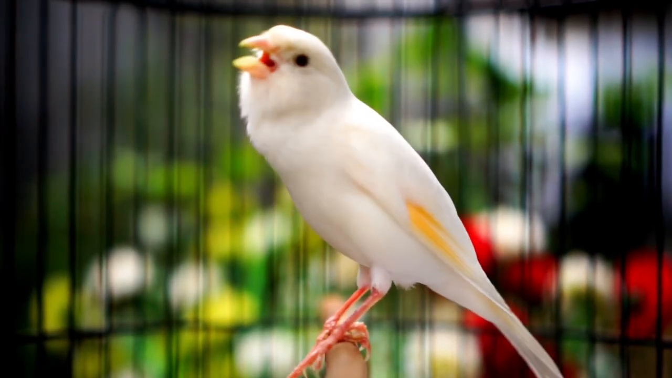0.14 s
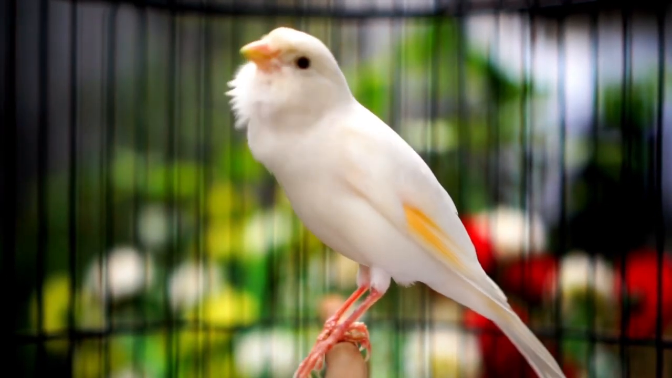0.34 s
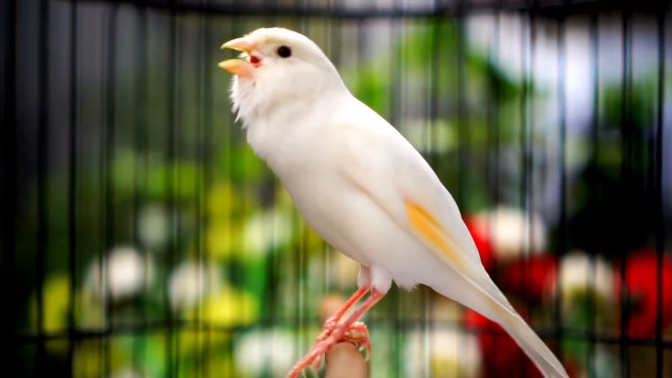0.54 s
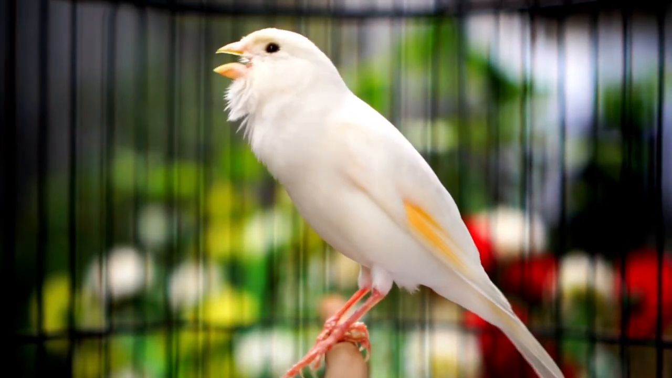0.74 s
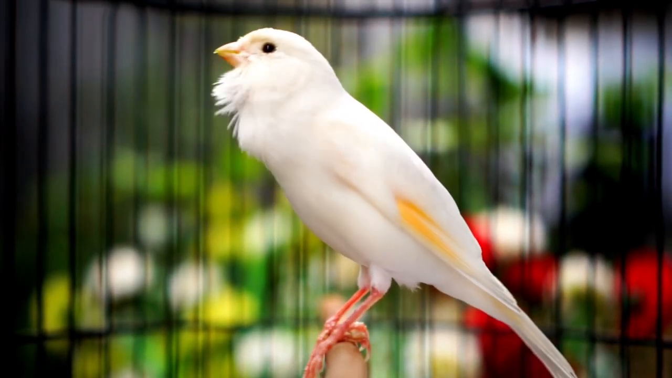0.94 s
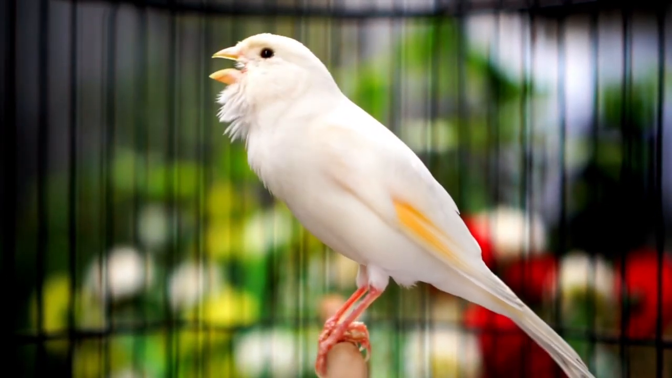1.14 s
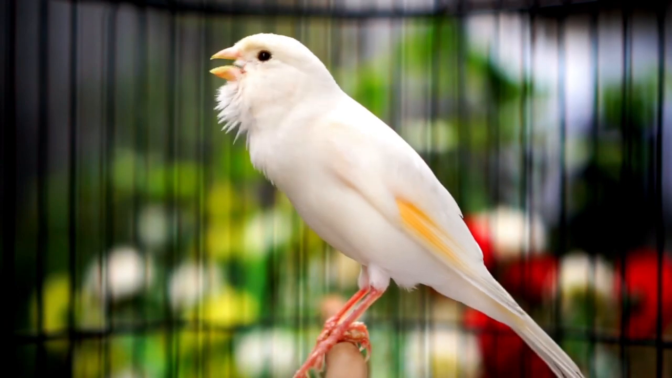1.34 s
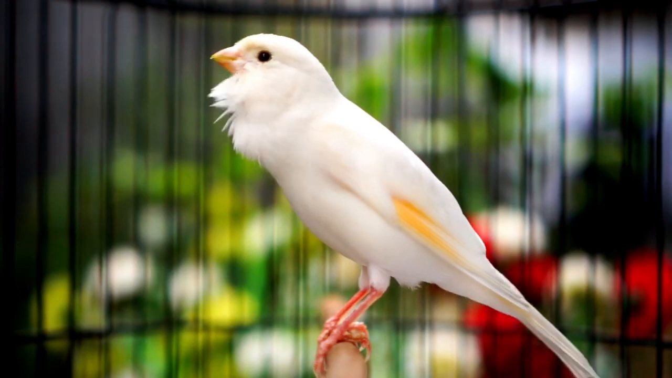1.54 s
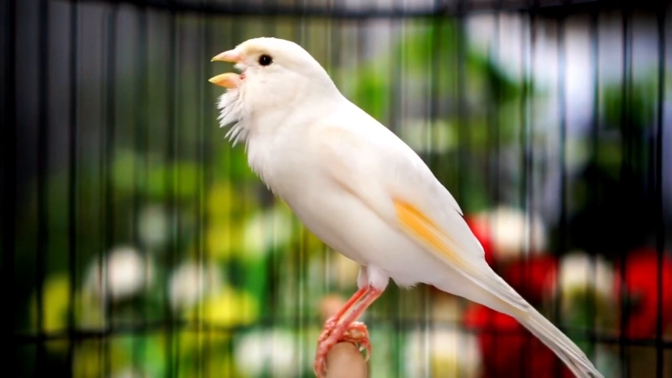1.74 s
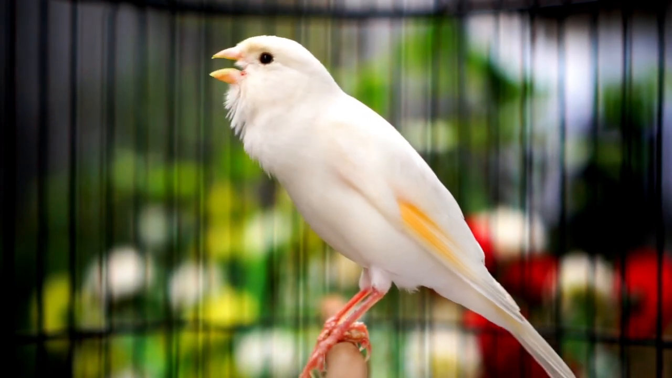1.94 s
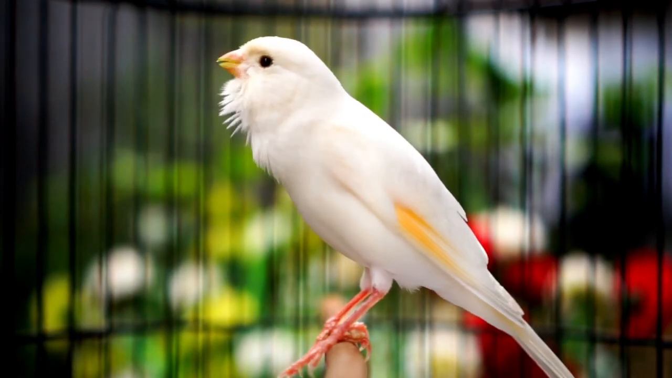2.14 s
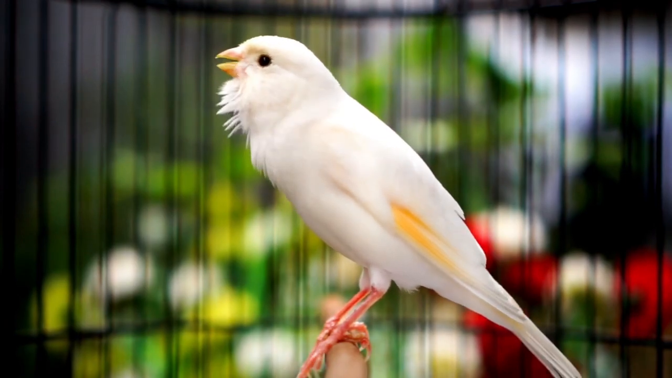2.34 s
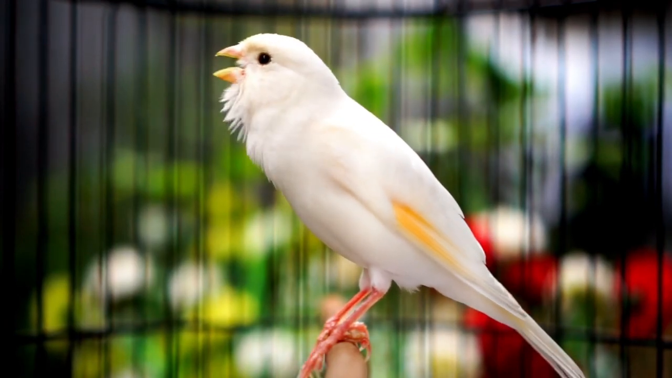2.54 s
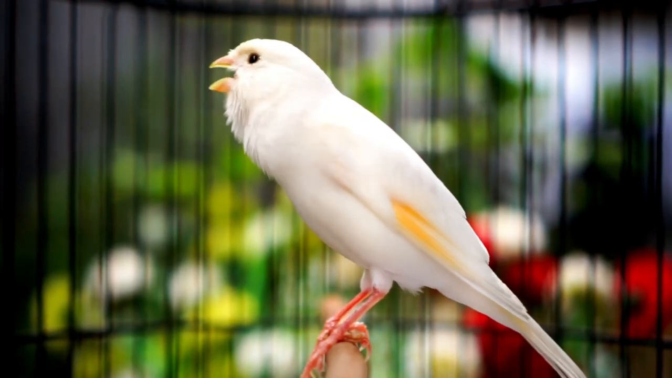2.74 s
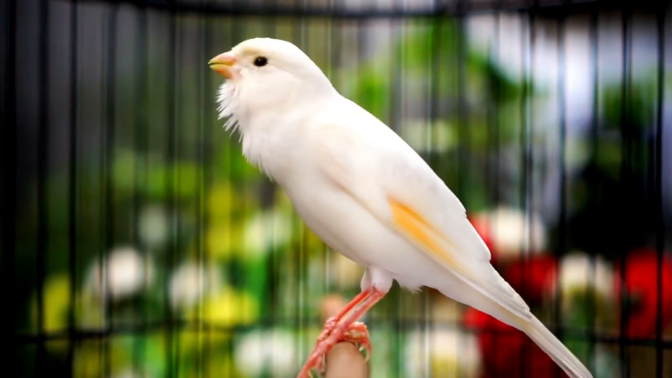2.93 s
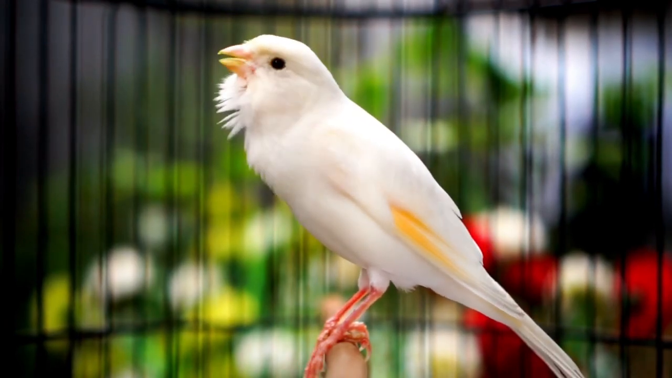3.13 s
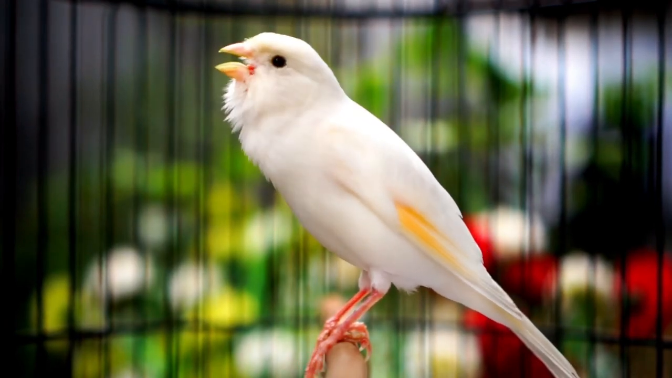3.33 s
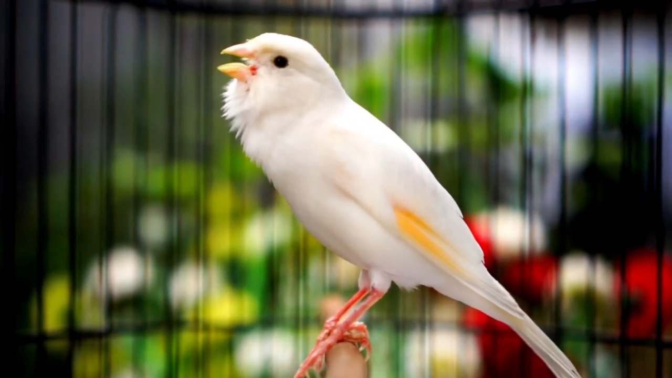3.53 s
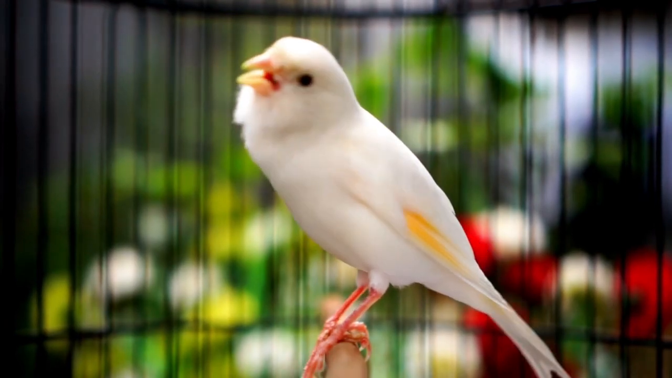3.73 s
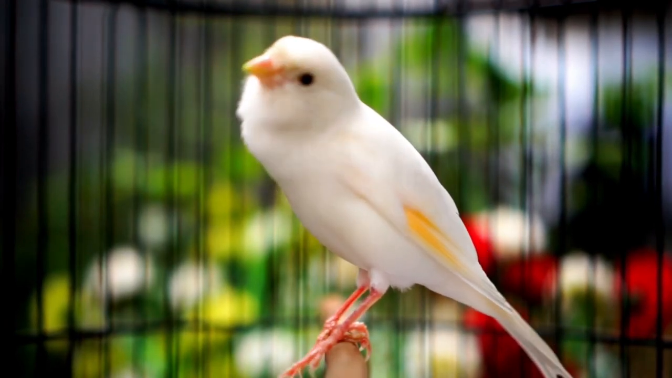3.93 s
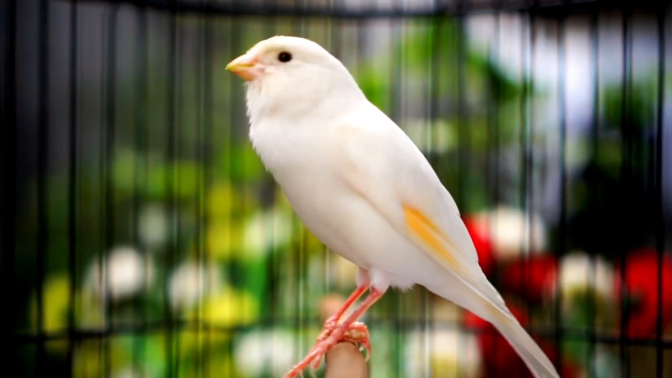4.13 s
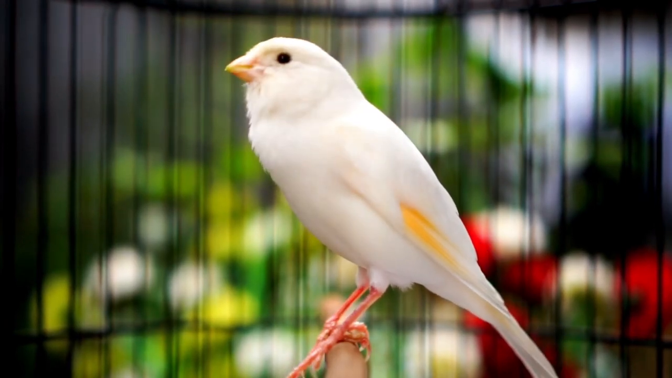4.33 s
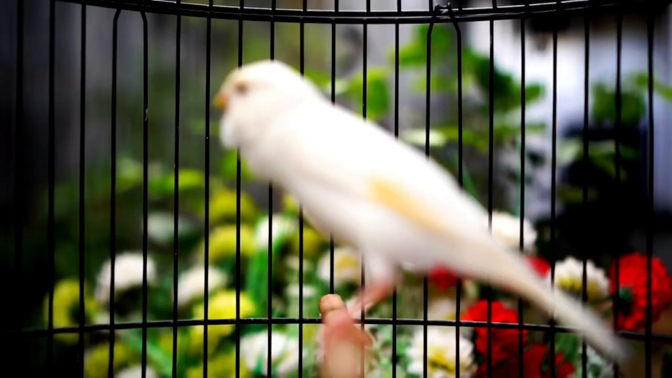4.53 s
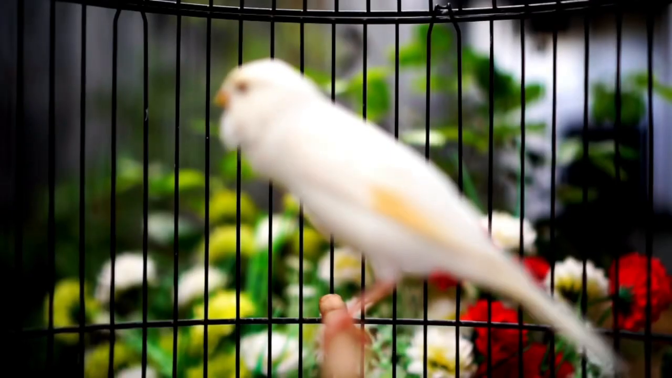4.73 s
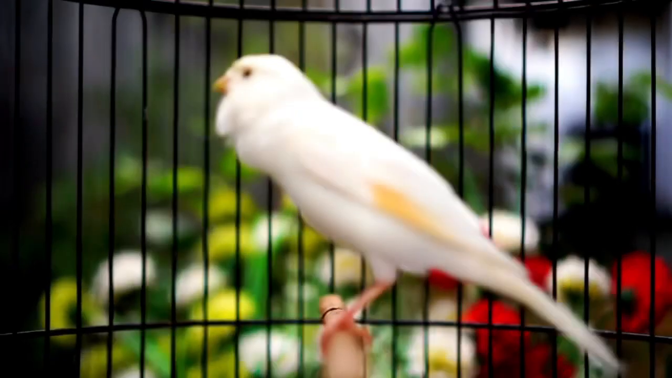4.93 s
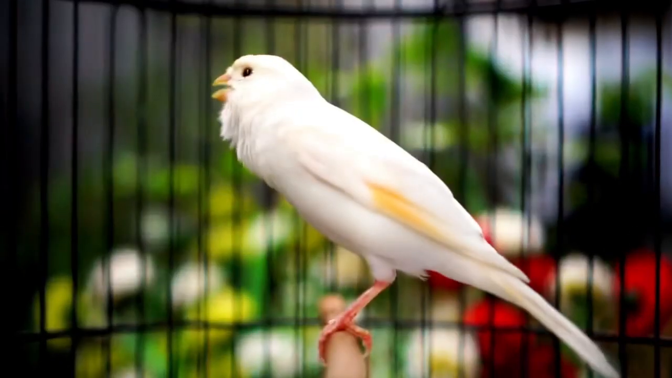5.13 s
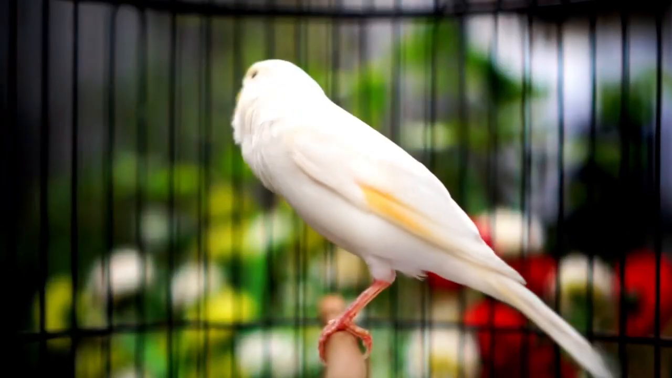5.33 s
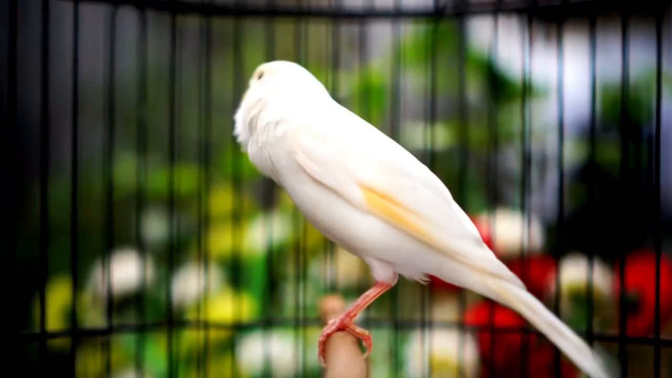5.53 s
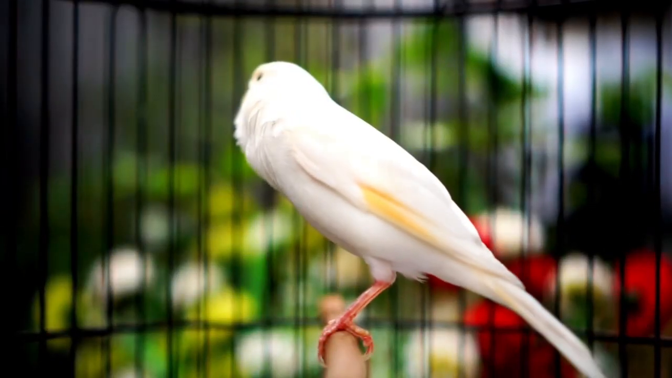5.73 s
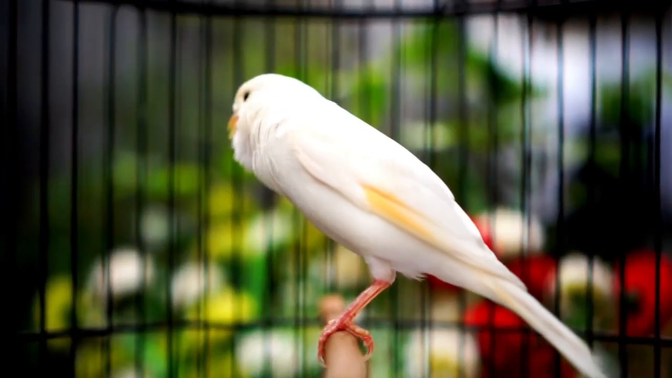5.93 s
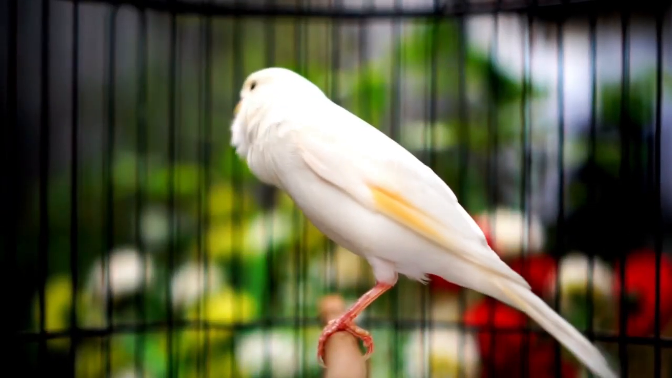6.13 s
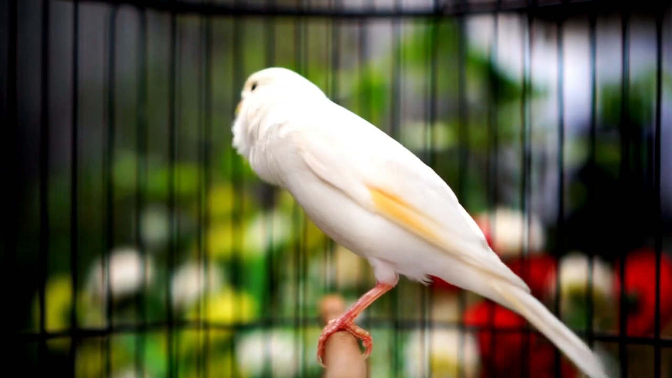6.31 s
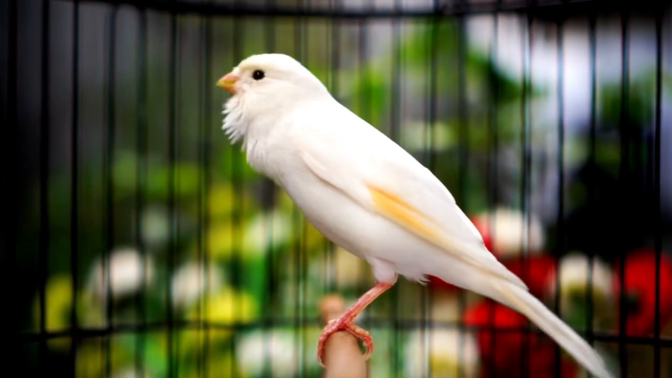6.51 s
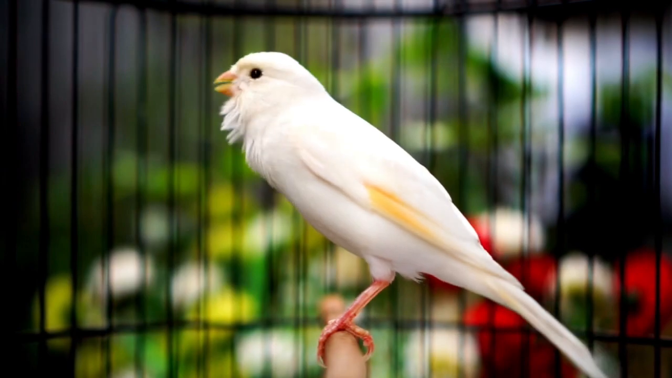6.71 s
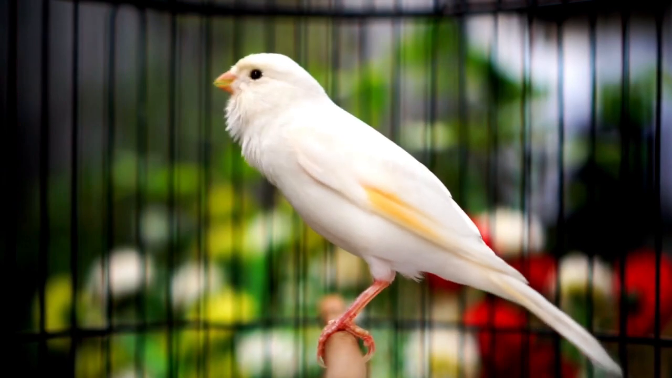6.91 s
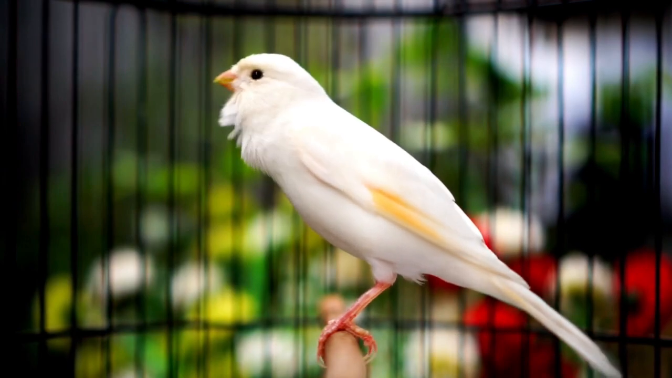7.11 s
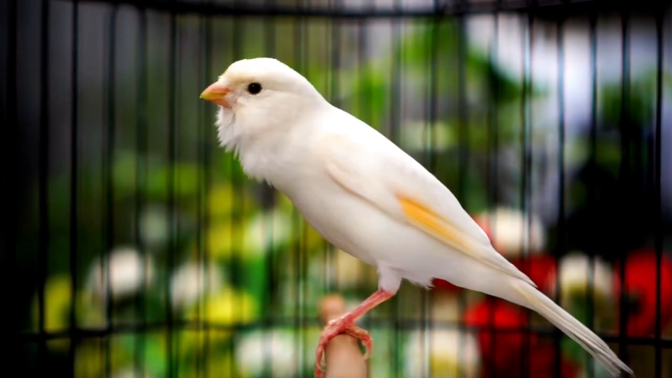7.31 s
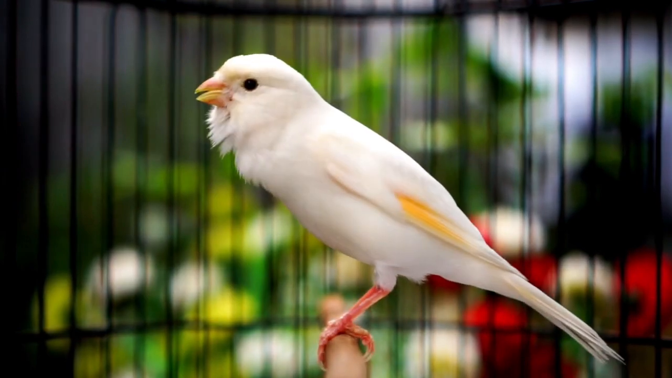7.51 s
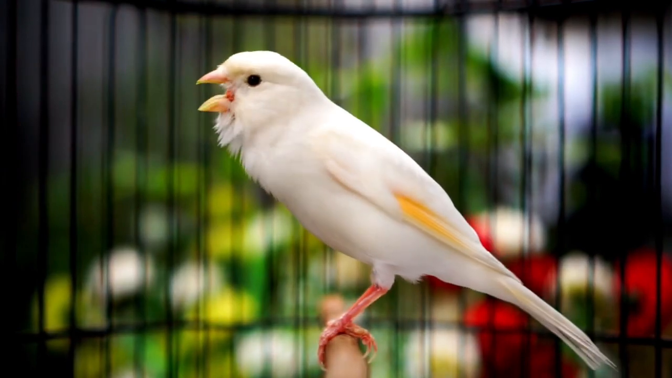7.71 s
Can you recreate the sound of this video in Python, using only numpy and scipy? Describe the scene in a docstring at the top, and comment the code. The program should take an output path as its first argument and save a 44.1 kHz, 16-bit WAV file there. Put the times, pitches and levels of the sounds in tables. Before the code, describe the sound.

A canary sings close by in a small room: sliding whistles, swoops, a fast tick run, rattles and warbles over a swelling, dropping background rush.

```python
"""A canary singing close by

A canary sings close to the microphone in a small room: slides, whistles, swoops, ticks, rolls and warbles.
Each syllable is a gliding tone with overtones, often repeated in a run; near walls and the room answer it.
A second bird sings faintly further off. Behind them filtered noise makes a rush that swells, then drops
back to a deeper rumble, with a low hum at its crest."""
import sys
import numpy as np
from scipy import signal
from scipy.fft import rfft, irfft, next_fast_len
from scipy.io import wavfile
from scipy.ndimage import map_coordinates

SR = 44100
rng = np.random.default_rng(int(sys.argv[2]) if len(sys.argv) > 2 else 0)


def waveform_to_disk(signal):
    """Save audio, clipped to [-1, 1], as 16-bit WAV at the path in sys.argv[1]."""
    frames = np.transpose(np.atleast_2d(signal))
    scaled = np.clip(frames, -1, 1) * 32767
    samples = np.round(scaled).astype(np.int16)
    wavfile.write(sys.argv[1], SR, samples)


N = 346626
TIME = np.arange(N) / SR
DROP_S = 4.68  # the rumble turns deeper here
HUM_HZ = 191.6  # centre of the wavering hum
TOP_HZ = 11250  # upper limit of the recorder

# All levels in these tables are those before the final mix.
# Shapes of the falling syllables, before each note's stretch and pitch factor; the names give the units
SLIDE_SHAPE = dict(length_s=0.22, end_hz=2725, fall_hz_per_s=15300, plunge_hz=1296, plunge_s=0.022, attack_s=0.034, release_s=0.047, edge_db=9, crescendo_db=12.5, third_db=-5)
TICK_SHAPE = dict(length_s=0.019, end_hz=3090, fall_hz_per_s=198000, plunge_hz=681, plunge_s=0.0017, attack_s=0.00086, release_s=0.0025, edge_db=32, crescendo_db=35.5, third_db=-25)
CHUCK_SHAPE = dict(length_s=.027, end_hz=1196, fall_hz_per_s=55000, plunge_hz=922, plunge_s=0.00375, attack_s=0.013, release_s=.011, edge_db=21, crescendo_db=3.5, third_db=0)
CHIP_SHAPE = dict(length_s=0.033, end_hz=2225, fall_hz_per_s=12000, plunge_hz=898, plunge_s=0.0024, attack_s=0.011, release_s=0.0082, edge_db=37, crescendo_db=-5, third_db=-14)
FAR_CHIRP_SHAPE = dict(length_s=0.069, end_hz=4800, fall_hz_per_s=13000, plunge_hz=302, plunge_s=.02, attack_s=0.014, release_s=0.056, edge_db=8, crescendo_db=-10, third_db=-23, jitter=0.058)
# Runs of falling syllables: [end t/s, time stretch, pitch factor, level/dB]
SLIDE_RUN = [(.043, 1, 1.035, -12.5), (.308, 0.95, 0.967, -15.5)]
TICK_RUN = [(3.23, 0.6, 1.06, -15), (3.2638, .33, 0.91, -11), (3.3005, 0.71, 0.98, -10.5),
            (3.342, .95, 0.96, -10.5), (3.3845, 0.84, 0.96, -10), (3.4287, 1.05, 0.95, -10),
            (3.4753, 0.85, 0.99, -9.5), (3.5202, 0.56, 0.98, -9), (3.5669, 0.93, 0.98, -10),
            (3.6155, 0.88, 0.98, -9.5), (3.6628, 0.77, 0.99, -9.5), (3.712, 1.2, 0.98, -9.5),
            (3.7653, 1.1, 0.98, -11.5)]
CHUCK_RUN = [(4.571, 0.73, 0.92, -28), (4.645, 0.9, 0.94, -23.5), (4.713, 0.82, 0.94, -18.5),
             (4.775, 0.81, 0.91, -18.5), (4.836, 0.83, 0.95, -16.5), (4.8965, 0.98, 0.93, -20),
             (4.962, 0.94, 0.93, -17)]
CHIP_RUN = [(5.041, 0.96, 1, -11.5)]  # the chip that ends the chucks
FAR_CHIRP_RUN = [(4.97, 1, 1, -37), (5.61, 0.8, 1, -35), (6.14, 1, 0.98, -38), (6.29, 1, 0.98, -36),
                 (6.44, 1, 0.96, -29), (6.59, 1, 1, -37)]
# Whistles of the near and the far bird: [start t/s, length t/s, start f/Hz, held f/Hz, rise t/s, drift/(Hz/s),
# attack t/s, release t/s, rising level/dB, held level/dB, dip between the two voices/dB]
WHISTLE_NOTES = [(.374, 0.18, 2916, 5640, 0.095, 1100.5, 0.022, 0.021, -14, -34, 36),
                 (.648, 0.22, 2900, 5113, .068, -1100, 0.012, 0.055, -20, -29.5, 10),
                 (.915, 0.27, 2280, 4081, 0.11, 154, 0.06, 0.014, -18.5, -15.5, 8.5),
                 (1.227, 0.22, 2200, 4022, 0.11, 123.5, 0.069, 0.019, -15, -13.5, 7.5),
                 (1.523, 0.25, 2167, 4007, 0.11, 74, 0.07, 0.019, -15, -14, 4.5),
                 (5.083, 0.12, 3630, 4077, 0.018, -700, 0.014, 0.038, -12.5, -12.5, 1.5),
                 (5.239, 0.11, 3078, 4040, 0.018, 451.5, 0.021, 0.019, -12, -12, 1.5)]
FAR_WHISTLE_NOTES = [(6.92, 0.19, 4270, 4650, 0.072, 503, 0.055, 0.037, -46, -31.5, 0.00023),
                     (7.12, 0.073, 5015, 5700, 0.024, 2, 0.026, 0.037, -41, -40.5, 0),
                     (7.19, 0.15, 4140, 4680, .13, 0, 0.058, 0.016, -33.5, -28.5, 0)]
# Swoops of the near and the far bird: [start t/s, time stretch, pitch factor, level/dB]
SWOOP_RUN = [(1.904, 0.99, 0.98, -14), (2.169, 0.94, 1, -13.5), (2.428, 0.97, 0.99, -12.5),
             (2.689, 0.92, 1.001, -13.5), (2.951, 0.95, 0.99, -12.5)]
FAR_SWOOP_RUN = [(3.82, 0.47, 1.07, -32.5), (3.98, 0.83, 0.96, -29), (4.25, .85, .99, -31),
                 (4.5, 0.96, 0.89, -31.5)]
# Arched notes, each answered by a peep from the other side of the syrinx (the bird's voice organ):
# [start t/s, length t/s, top f/Hz, level/dB, peep level/dB]
ARCH_NOTES = [(5.595, 0.0057, 3420, -12.5, -18), (7.283, 0.019, 2993, -18.5, -22),
              (7.308, .02, 3210, -9.5, -17), (7.333, .02, 3342, -13, -24), (7.356, .019, 3450, -10.5, -26),
              (7.383, 0.017, 3396, -12.5, -21), (7.408, .018, 3525, -9, -24),
              (7.433, 0.014, 3545, -11, -20.5), (7.457, .02, 3538, -9, -25), (7.485, .016, 3460, -16, -42)]
# Rolls of rattles: [start t/s, length t/s, spacing t/s, level/dB]
RATTLE_ROLLS = [(5.418, .111, 0.01, -26), (6.031, .112, 0.013, -23), (6.225, .105, 0.014, -23),
                (6.387, .105, 0.013, -19.5), (6.92, .116, 0.011, -24.5), (7.125, .104, 0.012, -22.5)]
# Warbled phrases: [start t/s, length t/s, first low note f/Hz, last low note f/Hz, level/dB]
WARBLE_PHRASES = [(5.599, 0.35, 3510, 3320, -11), (6.546, 0.3, 3473, 3293, -12.5)]
# Crests that the warbles climb to: [t/s, height f/Hz, width t/s, weakening/dB]
WARBLE_CRESTS = [(5.625, 1117, .019, 5), (5.685, 853, .016, 8.5), (5.749, 878, .019, 5),
                 (5.819, 826, .02, 5), (5.895, 735, .018, 7), (6.579, 1207, .023, 4),
                 (6.642, 837, .018, 5.5), (6.706, 875, .02, 4), (6.78, 823, .021, 6.5)]
# How strongly the microphone picks up the overtones: [f/Hz, level/dB]
OVERTONE_LEVELS = [(4000, -11), (6000, -43), (7500, -34.5), (8300, -32), (9500, -27.5), (11000, -24.5)]
# Extra strength of the ticks' overtones: [f/Hz, level/dB]
TICK_OVERTONE_BOOST = [(8300, 1), (9500, 8.5), (10700, 16)]
# Left-right difference for each pitch: [f/Hz, level/dB]
PITCH_BALANCE = [(2000, -5.5), (2700, 7), (3300, -3.5), (3700, 4), (4050, 4), (4500, 5.5), (5200, 5),
                 (7000, 2)]
# Left-right difference as the head turns: [t/s, level/dB]
HEAD_BALANCE = [(0, 3.5), (1.1, 3.5), (1.7, 4), (2.2, 4), (3.4, 1), (5.2, 3.5), (5.7, 1), (6.7, 0.5),
                (7.8, 2.5)]
# Delay of the left port as the bird shifts on its perch: [t/s, delay t/ms]
PORT_LAG = [(3.5, 0), (4.2, 0.096), (6.4, 0.068), (7, 0)]
# Echoes of near surfaces: [delay t/s, left gain, right gain]
WALL_ECHOES = [(.003, 0.066, 1), (.0074, 0.13, 0.17), (0.0111, 0.19, 0.12), (0.0197, .24, 0.18)]
# Time in which the room's tail fades by 60 dB: [f/Hz, fade t/s]
ROOM_FADE = [(1000, 0.25), (3000, 0.63), (5000, 0.56), (11000, 0.53)]
# Course of the rush, before the lift of its middle part: [t/s, low level/dB, middle level/dB]
RUSH_LEVELS = [(0.0, -68, -70), (0.5, -75, -71.5), (1.05, -65, -63), (1.878, -53.5, -52.5),
               (2.299, -55, -55.5), (3.4, -49, -48), (4.6, -40.5, -41.5), (4.77, -57.5, -53.5),
               (5.65, -60, -47), (6.45, -54, -45), (6.7, -57, -55), (7.35, -53.5, -48.5),
               (7.86, -62, -52.5)]
# Relative colours of the rumble before and after the drop, and of the airy middle: [f/Hz, level/dB]
EARLY_RUMBLE = [(15, -65.5), (25, -37.5), (124, -13.5), (184, -8), (230, -10), (280, -3.5), (360, -2),
                (500, -8), (700, -4), (910, -15.5), (1540, -120)]
LATE_RUMBLE = [(15, -60), (25, -23), (59, -3), (179, 0.5), (287, 1), (334, -4), (700, -5), (910, -25.5),
               (1540, -120)]
AIR_COLOUR = [(400, -14.5), (700, -7), (900, 1), (1090, 2), (1300, -2), (2000, -5), (4000, -2), (7000, -17),
              (11000, -22.5)]
# Likeness of the left and right rush, 1 being the same: [f/Hz, likeness]
STEREO_LIKENESS = [(30, .6), (100, 0.96), (300, 0.93), (700, 0.74), (1500, 0.51), (5000, 0.096)]
# The low tone at the crest of the rush: [t/s, level/dB]
HUM_LEVELS = [(3.5, -67), (3.9, -54), (4.55, -46.5), (4.66, -60), (4.72, -92)]


def near_bird(flutter_edge_db=5):
    """The whole near song; the fluttering phrases have slightly stronger overtones."""
    clear = downsweeps(SLIDE_RUN, **SLIDE_SHAPE) + downsweeps(CHUCK_RUN, **CHUCK_SHAPE)
    clear += downsweeps(CHIP_RUN, **CHIP_SHAPE)
    clear += whistles(WHISTLE_NOTES) + swoops(SWOOP_RUN) + arches()
    fluttering = (warbles() + quaver()) * amp([[0], [flutter_edge_db]])
    return microphone(clear + sharp_song() + fluttering)


def downsweeps(run, length_s, end_hz, fall_hz_per_s, plunge_hz, plunge_s, attack_s, release_s,
               edge_db, crescendo_db, third_db, jitter=.002):
    """The pitch falls steadily as the level changes, then plunges as the syrinx lets go."""
    track = np.zeros((2, N))
    for end, stretch, pitch, db in run:
        at, t = span(end - stretch * length_s, stretch * length_s)
        t = t / stretch
        left = length_s - t  # time still to go
        plunge = plunge_hz * (1 - np.exp(-left / plunge_s))
        hz = end_hz + fall_hz_per_s * left + plunge
        level = envelope(t, attack_s, release_s, edge_db)
        level -= crescendo_db * np.maximum(left - release_s, 0) / length_s
        add(track, at, pitch * hz, db + level, jitter=jitter, third_db=third_db)
    return track


def whistles(rows, knee_hz=125, scoop_hz=650, scoop_s=.006, break_hz=3620, break_width_hz=260,
             sag_db_per_s=14, settle_share=0.69):
    """A scoop and a climb to a held note; the level dips where one side of the syrinx hands to the other."""
    track = np.zeros((2, N))
    for row in rows:
        s, length, start_hz, held_hz, rise, drift, attack, release, rising_db, held_db, break_db = row
        at, t = span(s, length)
        held_time = np.maximum(t - rise, 0)
        climb = ease((held_hz - start_hz) * (1 - t / rise), knee_hz)
        scoop = scoop_hz * np.exp(-t / scoop_s)
        hz = held_hz + drift * held_time - climb - scoop
        settling = bump((t / rise) ** 2, 0, settle_share ** 2)  # from the rising level to the held one
        level = held_db + (rising_db - held_db) * settling - sag_db_per_s * held_time
        level += envelope(t, attack, release, edge_db=29)
        level -= break_db * bump(hz, break_hz, break_width_hz)
        add(track, at, hz, level, jitter=.002, shimmer_db=.7, third_db=-7)
    return track


def swoops(run, length_s=.22, aim_hz=2430, drop_hz=5600, relax_s=0.08, rest_hz=2940,
           scoop_hz=2000, scoop_s=0.00308, break_hz=4150, break_width_hz=430, break_db=6, swell_db_per_s=20):
    """The pitch leaps up and relaxes to a resting note, swelling but for a dip between the two voices."""
    track = np.zeros((2, N))
    for s, stretch, pitch, db in run:
        at, t = span(s, stretch * length_s)
        t = t / stretch
        relaxing = aim_hz + drop_hz * np.exp(-t / relax_s)
        hz = rest_hz + ease(relaxing - rest_hz, knee=70)
        hz -= scoop_hz * np.exp(-t / scoop_s)
        level = envelope(t, attack_s=0.088, release_s=0.071, edge_db=18.5)
        level += swell_db_per_s * (t - length_s / 2)
        level -= break_db * bump(hz, break_hz, break_width_hz)
        add(track, at, pitch * hz, db + level, third_db=-3)
    return track


def sharp_song(roll_edge_db=8):
    """Ticks and rolls are forced out abruptly, which strengthens their overtones."""
    ticks, rattles = downsweeps(TICK_RUN, **TICK_SHAPE), rolls()
    tick_overtones = filtered(ticks[1], lambda hz: amp(along(TICK_OVERTONE_BOOST, hz)))
    return np.array([ticks[0] + rattles[0], tick_overtones + amp(roll_edge_db) * rattles[1]])


def rolls(top_hz=3900, base_hz=2050, relax_s=0.00207, rattle_s=0.01, fade_db=5):
    """Each rattle snaps down to a low base note; the roll swells and fades."""
    track = np.zeros((2, N))
    for s, length, spacing, db in RATTLE_ROLLS:
        count = round(length / spacing)
        # Chance differences of each rattle: time (s), share of the pitch, level (dB)
        chance = rng.standard_normal((count, 3)) * [.0003, .025, 1.5]
        for k, (dt, bend, level) in enumerate(chance):
            at, t = span(s + spacing * k + dt, rattle_s)
            hz = (base_hz + (top_hz - base_hz) * np.exp(-t / relax_s)) * (1 + bend)
            level += envelope(t, attack_s=.0006, release_s=.004, edge_db=8)
            level -= fade_db * (2 * k / count - .8) ** 2
            add(track, at, hz, db + level, jitter=0.017, third_db=-0.5, fourth_db=-14)
    return track


def arches(top_share=0.596, bend_hz=1900, peep_hz=4250, peep_s=0.01, overlap_s=0.001):
    """Short notes that rise and tip over, each followed by a higher peep."""
    track = np.zeros((2, N))
    for s, length, top_hz, db, peep_db in ARCH_NOTES:
        at, t = span(s, length)
        share = t / length
        hz = top_hz - bend_hz * (share - top_share) ** 2
        # Here the attack and release are shares of the note
        add(track, at, hz, db + envelope(share, .3, .35, edge_db=21), third_db=-5)

        at, t = span(s + length - overlap_s, peep_s)
        hz = peep_hz - bend_hz / 2 * (t / peep_s - top_share) ** 2
        add(track, at, hz, peep_db + envelope(t, peep_s / 2, peep_s / 2, edge_db=3))
    return track


def warbles(flutter_hz=380, flutter_depth_hz=170, scatter_hz=70, rough_db=3.5, pulse_db=2.5,
            slow_fall=1.15, squareness=2.8):
    """A loud low note climbs to crest after crest, where it weakens and turns rough and fluttery."""
    track = np.zeros((2, N))
    when, height, width, weakening = np.transpose(WARBLE_CRESTS)
    for s, length, first_hz, last_hz, db in WARBLE_PHRASES:
        at, t = span(s, length)
        away = (s + t[:, None] - when) / width
        away = np.where(away > 0, away / slow_fall, away)  # crests fall slower than they rise
        crests = np.exp(-np.abs(away) ** squareness)
        rough = np.clip(1.5 * crests.sum(axis=1), .15, 1)
        flutter_rate = flutter_hz * (1 + .15 * wobble(at, 150))
        flutter = np.sin(2 * np.pi * np.cumsum(flutter_rate) / SR)
        hz = first_hz + (last_hz - first_hz) * t / length + crests @ height
        hz += rough * (flutter_depth_hz * flutter + scatter_hz * wobble(at, 450))
        level = db + envelope(t, attack_s=0.0095, release_s=0.036, edge_db=20) - crests @ weakening
        level += rough * (rough_db * wobble(at, 400) - pulse_db * flutter)
        add(track, at, hz, level, jitter=.004, third_db=-8.5)
    return track


def quaver(s=7.545, length_s=.226, start_hz=3830, climb_hz=1400, climb_s=0.11, period_s=0.0035, slowing=0.033,
           depth_hz=200, widen_hz_per_s=3900, db=-15.5, fade_db_per_s=12, pulse_db=4):
    """The closing buzz climbs; its zigzag vibrato slows and widens, loudest at the bottom of each swing."""
    track = np.zeros((2, N))
    at, t = span(s, length_s)
    swings_per_s = 1 / (period_s + slowing * t)
    swing = signal.sawtooth(2 * np.pi * np.cumsum(swings_per_s) / SR, .5)
    hz = start_hz + climb_hz * (1 - np.exp(-t / climb_s))
    hz += (depth_hz + widen_hz_per_s * t) * swing
    level = db + envelope(t, attack_s=.006, release_s=0.031, edge_db=10)
    level -= fade_db_per_s * (t - length_s / 2) + pulse_db * swing
    add(track, at, hz, level, jitter=.003)
    return track


def add(track, at, hz, db, jitter=0.0017, shimmer_db=1.5, third_db=-4, fourth_db=-18):
    """Sing one slightly unsteady tone into track: the fundamental in row 0, its overtones in row 1."""
    hz = hz * (1 + jitter * wobble(at, 500))
    phase = 2 * np.pi * np.cumsum(hz) / SR
    size = np.sqrt(2) * amp(db + shimmer_db * wobble(at, 120))
    size = size * signal.windows.tukey(len(at), np.clip(96 / len(at), .05, 1))  # soft ends, no clicks
    track[0, at] += size * np.sin(phase)
    for k, level in enumerate([0, third_db, fourth_db], 2):
        audible = np.clip((SR / 2 - k * hz) / 6000, 0, 1)  # fade out below half the sample rate
        track[1, at] += size * amp(level) * audible * np.sin(k * phase)


def microphone(track, notch_hz=6200, notch_width_hz=450, notch_db=13):
    """The microphone hears the fundamental freely but for one notch in the treble; the overtones stay weak."""
    tone = filtered(track[0], lambda hz: amp(-notch_db * bump(hz, notch_hz, notch_width_hz)))
    overtones = filtered(track[1], lambda hz: amp(along(OVERTONE_LEVELS, hz)))
    return tone + overtones


def far_bird():
    """A second canary sings swoops, hoarse chirps and whistles, made in the same way."""
    chirps = downsweeps(FAR_CHIRP_RUN, **FAR_CHIRP_SHAPE)
    return microphone(swoops(FAR_SWOOP_RUN) + chirps + whistles(FAR_WHISTLE_NOTES))


def walls(x, ring_s=0.022, ring_hz=2720, ring_width_hz=220, ring_db=-11):
    """Direct sound at the two ports, and echoes of near surfaces; one returns only a narrow band."""
    half_lag = np.interp(TIME, *np.transpose(PORT_LAG)) * SR / 2000  # half the lag, ms to samples
    out = np.array([map_coordinates(x, [np.arange(N) + side * half_lag]) for side in (-1, 1)])
    for delay, left, right in WALL_ECHOES:
        echo = np.pad(x, (int(delay * SR), 0))[:N]
        out += np.outer([left, right], echo)

    def narrow_echo(hz):
        delayed = np.exp(-2j * np.pi * hz * ring_s)
        return bump(hz, ring_hz, ring_width_hz) * delayed
    return out + amp(ring_db) * filtered(x, narrow_echo)


def room(x, gap_s=0.0046):
    """The diffuse tail: noise in which each frequency dies at its own speed."""
    hz, t, z = signal.stft(rng.standard_normal((2, SR // 2)), SR, nperseg=256)
    fading = amp(-60 * t / along(ROOM_FADE, hz)[:, None])
    tail = signal.istft(z * fading, SR, nperseg=256)[1]
    tail = tail / np.linalg.norm(tail[0])
    late = np.pad(x, (int(gap_s * SR), 0))
    return signal.fftconvolve(late[None], tail, axes=1)[:, :N]


def background(air_db=5.0, wander_db=1.54):
    """A broad, slightly unsteady rush that swells, drops back and leaves a deeper rumble."""
    s, low, middle = np.transpose(RUSH_LEVELS)
    rumble = np.where(TIME < DROP_S, rush(EARLY_RUMBLE), rush(LATE_RUMBLE))
    low_level = np.interp(TIME, s, low) + wander_db * wobble(TIME, 7)
    air_level = np.interp(TIME, s, middle) + air_db + wander_db * wobble(TIME, 7)
    return amp(low_level) * rumble + amp(air_level) * rush(AIR_COLOUR)


def rush(spectrum):
    """Coloured stereo noise of rms 1; left and right are most alike in the bass."""
    def colour(hz):
        turn = np.arccos(np.clip(along(STEREO_LIKENESS, hz), -1, 1)) / 2
        return amp(along(spectrum, hz)) * [np.cos(turn), np.sin(turn)]
    mid, side = filtered(rng.standard_normal((2, N)), colour)
    return unit(np.array([mid + side, mid - side]))


def hum(waver=0.015):
    """A wavering low tone that ends when the rush drops."""
    phase = 2 * np.pi * np.cumsum(HUM_HZ * (1 + waver * wobble(TIME, 20))) / SR
    level = np.interp(TIME, *np.transpose(HUM_LEVELS)) + 1.8 * wobble(TIME, 12)
    started = TIME > HUM_LEVELS[0][0]
    return amp(level) * np.sin(phase) * started


def span(s, length_s):
    """The samples that a note covers, and the time since its start."""
    at = np.arange(max(0, int(s * SR)), min(N, int((s + length_s) * SR)))
    return at, np.maximum(at / SR - s, 0)


def envelope(t, attack_s, release_s, edge_db):
    """Attack, hold and release in dB, from and to edge_db below the hold."""
    attack = np.clip(1 - t / attack_s, 0, 1) ** 2
    release = np.clip(1 - (t[-1] - t) / release_s, 0, 1) ** 2
    return -edge_db * (attack + release)


def wobble(t, rate):
    """A smooth random curve over the times t, with rate random points a second."""
    knots = np.arange(len(t)) * rate / SR
    return map_coordinates(rng.standard_normal(int(len(t) * rate / SR) + 4), [knots + 1])


def bump(x, centre, width):
    """A bell curve of height 1."""
    return np.exp(-((x - centre) / width) ** 2)


def ease(excess, knee):
    """The positive part of excess, with a rounded corner."""
    return knee * np.logaddexp(0, excess / knee)


def amp(db):
    """Decibels to gain."""
    return 10 ** (np.asarray(db) / 20)


def unit(x):
    """Scale to rms 1 (rms is a kind of average size)."""
    return x / np.sqrt(np.mean(x ** 2) + 1e-20)


def along(points, hz):
    """Read a table of (f/Hz, value) at any frequency, on a log axis."""
    f, v = np.transpose(points)
    return np.interp(np.log(hz + 1), np.log(f + 1), v)


def filtered(x, response):
    """Reshape the frequencies of x by the gain that response gives for each."""
    m = next_fast_len(N + SR // 4)
    return irfft(rfft(x, m) * response(np.fft.rfftfreq(m, 1 / SR)), m)[..., :N]


def scene(song_db=-4.0, room_db=-11.5, far_db=-3):
    """The near bird is mostly direct sound, the far one mostly room."""
    song, far = near_bird(), far_bird()
    sides = np.array([[.5], [-.5]])  # half of each difference to the left, half to the right
    turning = sides * np.interp(TIME, *np.transpose(HEAD_BALANCE))
    near = amp(song_db + turning) * walls(song) + amp(room_db) * room(song)
    near = filtered(near, lambda hz: amp(along(PITCH_BALANCE, hz) * sides))
    distant = amp(far_db) * (room(far) + far / 2)
    return near + distant + background() + hum()


def record(dry):
    """The recorder's steep band limit."""
    return filtered(dry, lambda hz: 1 / np.sqrt(1 + (hz / TOP_HZ) ** 220))


dry = scene()
out = record(dry)
waveform_to_disk(out)
```